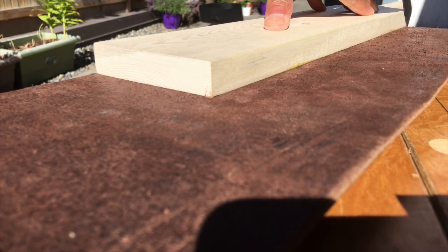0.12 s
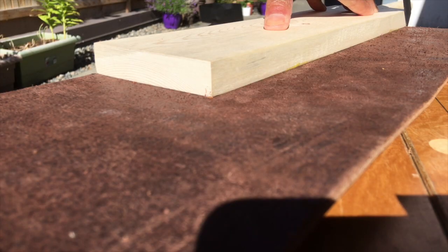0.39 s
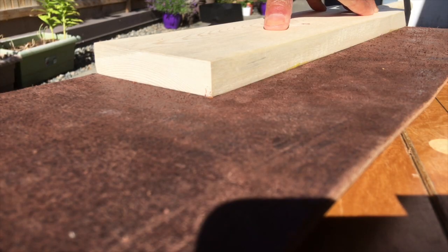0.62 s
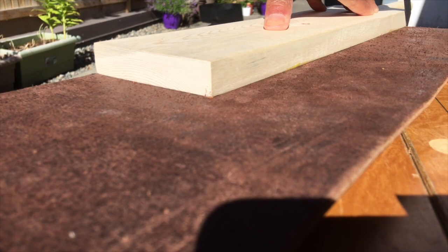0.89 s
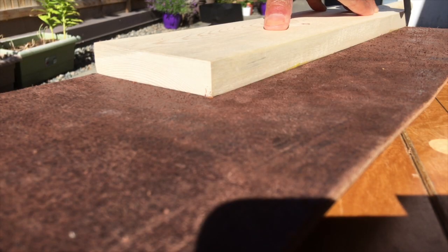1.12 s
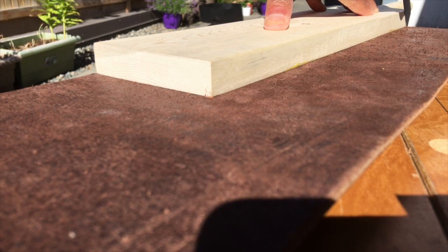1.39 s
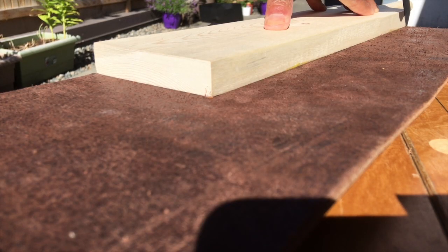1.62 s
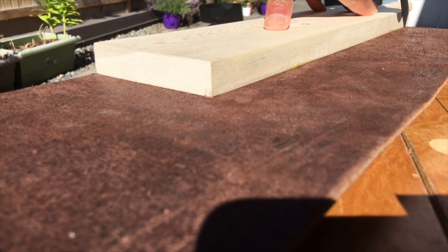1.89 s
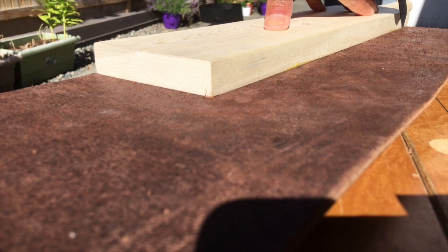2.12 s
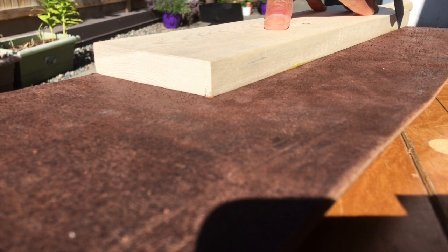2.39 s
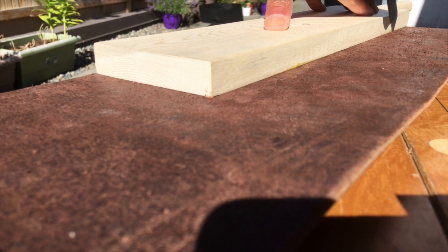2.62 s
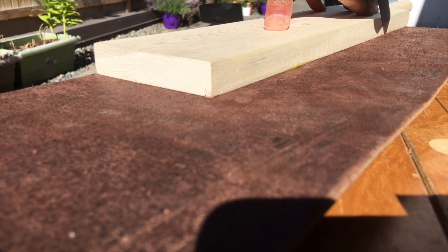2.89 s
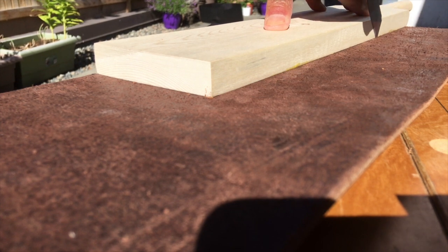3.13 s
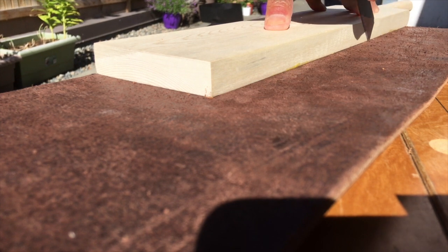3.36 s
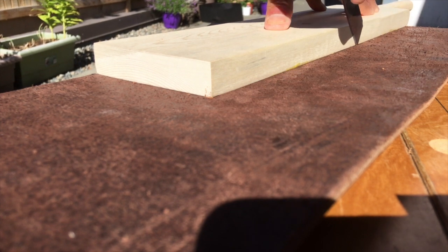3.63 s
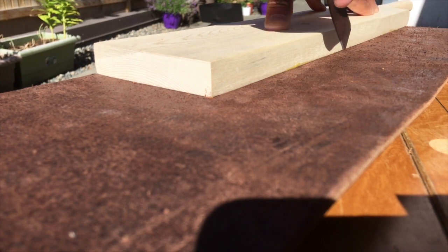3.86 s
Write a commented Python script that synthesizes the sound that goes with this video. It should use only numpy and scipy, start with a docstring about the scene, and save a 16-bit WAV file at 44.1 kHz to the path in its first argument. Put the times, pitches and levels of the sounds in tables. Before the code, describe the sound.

Blade scraping on wood: faint touches, a small tick and brief scratch, then a long, gritty, shifting rasp with one late knock, recorded close outdoors over soft traffic wash and a far engine's low throb.

```python
"""Heard first: a far engine that slows, revs once and slows again, over traffic wash, both outdoors.
Engine: cosines at orders of a gliding firing rate. Wash: coloured noise in drifting patches.
Faint brushes, then a steel blade lands with a tick on a softwood board, is drawn along its edge
toward the microphone, and knocks once. Brushes, ticks: shaped noise; knock: noise in board rings.
Stroke: dense grit-like slips drive rings of blade and board whose levels and pitches shift."""
import sys
import numpy as np
from scipy import signal
from scipy.fft import rfft, irfft
from scipy.io import wavfile
from scipy.ndimage import uniform_filter1d

SR = 44100
rng = np.random.default_rng(int(sys.argv[2]) if len(sys.argv) > 2 else 0)


def volts_from_db(level):
    """Convert decibel levels to linear amplitude ratios."""
    exponent = np.asarray(level, float) / 20
    return 10 ** exponent


def wav_out(sig):
    """Save sig, one row per channel (or a flat mono array), as 16-bit PCM at SR to the path in sys.argv[1]."""
    wavfile.write(sys.argv[1], SR, np.round(np.clip(np.atleast_2d(sig).T, -1, 1) * 32767).astype(np.int16))


N = 176400

# traffic spectrum, relative: f/Hz, density/dB per Hz
WASH_SPECTRUM = [(12, -36.5), (20, -16), (60, 3.5), (116, -1), (177, -8), (388, -23.5), (976, -22.5),
                 (1330, -24), (2750, -39), (3440, -41), (4940, -48.5), (12800, -59), (16000, -77.5)]
# traffic swell: t/s, level/dB over WASH_DB
WASH_SWELL = [(0, 2), (2.5, 2.5), (4, 0.5)]
WASH_DB, WASH_PATCH_DB = -57, 1

# engine firing rate: t/s, f/Hz
FIRING_RATE = [(0, 35.8), (.27, 34.4), (.44, 32.7), (.64, 31), (1, 27.7), (1.22, 26.8), (1.41, 29.5),
               (1.55, 31.5), (1.8, 30.1), (2.12, 28.1), (2.45, 26), (2.98, 22.3), (3.24, 21), (3.6, 19.8),
               (3.84, 19.3), (4, 18.6)]
# strong engine orders: t/s, rms level/dB of orders 2, 3, 4, 5
STRONG_ORDERS = [(0, -69, -48.5, -72, -67), (.27, -61, -54, -68, -59), (.45, -53, -52.5, -66, -56.5),
                 (.64, -56, -64.5, -56, -52), (.83, -57, -51.5, -55.5, -63), (1.05, -57, -70.5, -62, -54),
                 (1.26, -63.5, -67, -63, -58.5), (1.41, -49, -51, -47, -66), (1.65, -52, -50.5, -49, -55.5),
                 (1.9, -54.5, -44, -50.5, -54.5), (2.1, -62, -55, -54, -60), (2.4, -61, -54, -57, -54.5),
                 (2.69, -51.5, -55, -63, -46.5), (2.87, -62, -56, -50, -50.5),
                 (3.0, -59, -57, -48.5, -46.5), (3.24, -79, -76, -55, -57.5), (3.5, -63, -52, -46.5, -51),
                 (3.75, -60, -53.5, -45.5, -47.5), (4, -70, -65, -48, -52)]
# engine orders 7 and 9: t/s, rms level/dB of 7, of 9
UPPER_ORDERS = [(0, -76, -82), (.25, -66.5, -76), (.55, -76, -88), (.85, -69.5, -68), (1.1, -65.5, -60),
                (1.3, -60, -61), (1.5, -67, -76), (1.8, -59, -68), (2.15, -69, -62.5), (2.4, -77, -64),
                (3, -78, -72.5), (4, -90, -85)]
# other engine orders by frequency: f/Hz, level/dB
EXHAUST_SPECTRUM = [(15, -92.5), (40, -68.5), (130, -73.5), (170, -69.5), (200, -70.5), (245, -69.5),
                    (290, -73), (330, -76), (380, -81), (450, -89.5)]
# other engine orders over time: t/s, level/dB added to the spectrum
EXHAUST_LEVEL = [(0, -4), (.8, -3.5), (1.1, -5), (1.5, 4.5), (2.2, -2), (2.8, -2), (4, -6)]
THROB_DB, THROB_RAD, THROB_S = 2.5, 0.25, 0.07
WAVER_DB, WAVER_S = 4.5, 0.1
BLUR_RAD, BLUR_S = 0.08, 0.07

# light brushes of hand or blade: t/s, length/s, dull level/dB, thin bright level/dB
BRUSHES = [(.239, 0.0027, -91, -79), (0.715, 0.058, -82, -90), (0.968, 0.044, -89, -89),
           (1.553, 0.027, -78, -92), (1.617, 0.011, -78, -87), (1.639, 0.01, -76, -85),
           (1.606, 0.075, -73, -99)]
# dull brush spectrum, relative: f/Hz, density/dB per Hz
DULL_BRUSH_SPECTRUM = [(1180, -25), (2000, -2), (3430, -6), (5450, -22), (6190, -13), (13000, -45),
                       (15000, -34.5)]
# bright brush spectrum, relative: f/Hz, density/dB per Hz
BRIGHT_BRUSH_SPECTRUM = [(4000, -26), (6500, -3), (9500, 10), (14000, 6), (16000, -26)]
# blade lands: t/s, level/dB
LANDINGS = [(1.8412, -51), (2.156, -61)]
# landing tick spectrum, relative: f/Hz, density/dB per Hz
TICK_SPECTRUM = [(1500, -13), (2800, 12), (4200, -7), (6300, 3), (9000, -19), (15500, -2)]
# blade catches on the grain: t/s, level/dB
KNOCKS = [(3.64, -39)]
LANDING_T60_S, KNOCK_T60_S = 0.011, 0.023

# stroke: t/s, level/dB
STROKE_LEVEL = [(1.86, -80), (1.9, -60.5), (1.91, -67), (1.94, -52.5), (1.96, -60.5), (1.97, -54),
                (2.08, -65.5), (2.12, -64.5), (2.128, -91), (2.15, -86), (2.158, -69.5), (2.18, -68.5),
                (2.2, -64.5), (2.25, -58), (2.26, -61.5), (2.47, -58), (2.56, -61), (2.69, -53),
                (2.82, -58), (2.94, -54.5), (2.97, -54.5), (3.21, -52.5), (3.46, -52.5), (3.47, -50.5),
                (3.52, -53), (4.0, -52.5)]
# ring groups along the board: t/s, level/dB over the stroke of board, upper, treble, bright
GROUP_LEVEL = [(1.9, -38, -11, -24, -27), (2.1, -17, -10, -33, -28), (2.3, -22, -15, -9.5, -12.5),
               (2.55, -32, -24, -18.5, -24), (2.65, -19, -5.5, -16.5, -14), (3.0, -31, -15, -5, -10.5),
               (3.15, -12, -10.5, -11.5, -22), (3.3, -13.5, -25, -10.5, -12.5), (3.55, -16, -6, -8, -20),
               (3.7, -10, -13, -7, -6), (4, -7.5, -6.5, -14, -8)]
# board rings: f/Hz, width/Hz, level/dB within group
BOARD_RINGS = [(510, 45, 3.5), (800, 140, 10), (1297, 124, 18.5), (2200, 98, 19)]
# upper rings: f/Hz, width/Hz, level/dB within group
UPPER_RINGS = [(5830, 200, -5), (6400, 170, 3)]
# treble rings: f/Hz, width/Hz, level/dB within group
TREBLE_RINGS = [(7000, 746, 0.5), (9140, 170, -17), (8860, 900, -4.5), (9540, 1300, -2.5),
                (11700, 1900, -19.5)]
# bright rings: f/Hz, width/Hz, level/dB within group
BRIGHT_RINGS = [(11850, 540, 11), (12800, 350, 2.7)]
# top of the treble: f/Hz, width/Hz, level/dB within group
AIR_RING = [(15400, 6500, 0)]
# top of the treble: t/s, level/dB over the stroke
AIR_LEVEL = [(1.9, -18), (2.3, -21), (2.55, -19), (2.7, -21), (3.2, -20), (3.6, -29), (4, -8)]
# lowest board ring: f/Hz, width/Hz of each of two passes, level/dB within group
THRUM_RING = [(320.4, 53, 0)]
# unringing part, relative: f/Hz, density/dB per Hz
RASP_SPECTRUM = [(240, -63), (400, -31), (536, 0.5), (1090, -9.5), (2320, 0), (5690, -4.5), (7630, -16),
                 (11800, -22), (16000, -54)]
RASP_DB, THRUM_DB = -2, -14  # over the stroke
# rings that shift with the contact point, one track each: t/s, f/Hz, level/dB over the stroke
MOVING_RINGS = [
    [(1.9, 2400, -26), (2.25, 2350, -13), (2.6, 2360, -35), (2.95, 2410, -5), (3.3, 2510, -5.5),
     (3.6, 2280, -10), (4, 2270, -28)],
    [(1.9, 2790, -23), (2.25, 2680, -5), (2.5, 2760, -11.5), (2.7, 2680, -14.5), (3.0, 2620, 2),
     (3.3, 2710, -15), (3.5, 2770, -17), (3.8, 2760, -9), (4, 2680, -3.5)],
    [(1.9, 3160, -10), (2.5, 3176, -6.5), (2.8, 3170, -13), (3.0, 3120, -10), (3.08, 3300, -15),
     (3.09, 3580, -10), (3.14, 3280, -7), (3.185, 3470, -3.5), (3.2, 3320, -15), (3.6, 3320, -15),
     (4, 3370, -5)],
    [(1.9, 3500, -14), (2.25, 3480, -7), (2.4, 3760, -8), (2.7, 3880, -1), (2.85, 3980, -8),
     (3.05, 3820, -28), (3.3, 3780, -26), (4, 3830, -8.5)],
    [(1.9, 4230, -20), (2.55, 4150, -6), (2.72, 4370, -8), (2.85, 4430, -5), (3.1, 4500, -13),
     (3.125, 4460, -32), (3.19, 4500, -30), (3.21, 4500, -25), (3.4, 4720, -15), (3.66, 4260, -19),
     (3.76, 4140, -3.5), (4, 4210, -9)],
]
# the same rings: width/Hz of each of two passes
MOVING_WIDTHS = [380, 210, 240, 290, 400]
# dips where sound off the table cancels the direct: width/Hz, track of t/s, f/Hz, depth/0-1
TABLE_DIPS = [(356, [(1.9, 5730, 1), (2.3, 5760, 1), (2.45, 5300, 0.4), (2.8, 5140, 0.02), (3.0, 4940, 1),
              (3.1, 4730, 0.9), (3.125, 4400, 1), (3.185, 4200, 1), (3.2, 4220, 0), (3.4, 4050, 0.4),
              (3.6, 4730, 0), (3.78, 4800, 0.6), (4, 5100, 0.5)]), (304, [(1.9, 5030, 0.3),
              (2.3, 5250, 0.5), (2.4, 6000, 0.7), (2.5, 6560, 1), (3.05, 6150, 0.6), (3.2, 6100, 0.46),
              (3.65, 6450, 1), (3.75, 6400, 0.6), (4, 6860, 0.8)]), (710, [(1.9, 7800, 0.29),
              (2.15, 8300, 0.9), (2.5, 8900, 0.48), (2.9, 7740, 0.7), (3.3, 8100, 0.1), (3.7, 6900, 1),
              (4, 7800, 0)]), (202, [(1.9, 1180, 1), (2.6, 1220, 0.9), (3.05, 1230, 1), (3.5, 1130, 0.27),
              (4, 1050, 0.5)]), (300, [(2.95, 3800, 0.3), (3.05, 3950, 0.7), (3.11, 4000, .8),
              (3.12, 4000, 0.1)])]
# patches of colour that drift as the grain changes: f/Hz, rms depth/dB
GRAIN_PATCHES = [(300, 1.0), (6000, 1.0), (8000, 1.8), (16000, 1.8)]
# quick treble chatter, stronger early in the stroke: t/s, rms depth/dB
CHATTER_DEPTH = [(1.9, 2.5), (2.55, 2.5), (2.75, 1.2), (4, 1.0)]
CHATTER_S, CHATTER_HZ = 0.003, 3000
SLIPS_PER_S, SLIP_SPREAD_DB = 14000, -0.5
JUDDER_DB, JUDDER_S = 0.1, 0.014
WOBBLE_SHARE, WOBBLE_S = 0.007, 0.015

EDGE_HZ = 15780


def evened(x):
    """Scales to rms 1."""
    return x / np.sqrt(np.mean(x ** 2) + 1e-20)


def curve(rows, column=1):
    """One table column, interpolated at every sample."""
    rows = np.array(rows)
    return np.interp(np.arange(N) / SR, rows[:, 0], rows[:, column])


def colour(x, spectrum):
    """Filters by a spectrum table, linear in dB over log frequency; rms 1."""
    f_hz, db = np.transpose(spectrum)
    bin_hz = np.fft.rfftfreq(len(x), 1 / SR)
    gain = volts_from_db(np.interp(np.log(bin_hz + 1), np.log(f_hz + 1), db))
    return evened(irfft(rfft(x) * gain, len(x)))


def drift(window_s):
    """Slow random curve of rms 1: noise averaged twice."""
    size = max(int(window_s * SR), 2)
    return evened(uniform_filter1d(uniform_filter1d(rng.standard_normal(N), size), size))


def patchy(x, depth_db, bins, frames):
    """Random louder and softer patches over time and frequency."""
    z = signal.stft(x, nperseg=1024, noverlap=768)[2]
    patches = rng.standard_normal(z.shape)
    for _ in range(2):
        patches = uniform_filter1d(patches, bins, 0)
        patches = uniform_filter1d(patches, frames, 1)
    z = z * volts_from_db(depth_db * evened(patches))
    return signal.istft(z, nperseg=1024, noverlap=768)[1][:N]


def resonate(x, hz, width_hz):
    """Resonance of gain 1: shift to 0 Hz, one-pole low-pass, shift back; hz may be a curve."""
    turn = np.exp(2j * np.pi * np.cumsum(hz * np.ones(len(x))) / SR)
    r = np.exp(-np.pi * width_hz / SR)
    return 2 * (turn * signal.lfilter([1 - r], [1, -r], x / turn)).real


def rings(x, table):
    """Parallel resonances, summed to rms 1."""
    return evened(sum(volts_from_db(db) * resonate(x, hz, width_hz) for hz, width_hz, db in table))


def decays(hits, t60_s):
    """Sudden onsets that fall 60 dB in t60_s."""
    t = np.arange(N) / SR
    return sum((t >= s) * volts_from_db(db - 60 * np.maximum(t - s, 0) / t60_s) for s, db in hits)


def wash():
    """Distant traffic: coloured noise with drifting patches."""
    noise = colour(rng.standard_normal(N), WASH_SPECTRUM)
    noise = evened(patchy(noise, WASH_PATCH_DB, bins=8, frames=10))
    return volts_from_db(WASH_DB + curve(WASH_SWELL)) * noise


def engine():
    """Orders of the firing rate: 2-5 swell and slip singly, the rest share a phase blur."""
    firing_hz = curve(FIRING_RATE)
    phase = 2 * np.pi * np.cumsum(firing_hz) / SR
    blurred = phase + BLUR_RAD * drift(BLUR_S)
    out = np.zeros(N)
    for k in range(2, 6):
        level_db = curve(STRONG_ORDERS, column=k - 1) + THROB_DB * drift(THROB_S)
        slip = 2 * np.pi * rng.random() + THROB_RAD * drift(THROB_S)
        out += volts_from_db(level_db) * np.cos(k * phase + slip)
    for column, k in ((1, 7), (2, 9)):
        out += volts_from_db(curve(UPPER_ORDERS, column)) * np.cos(k * blurred)
    f_hz, db = np.transpose(EXHAUST_SPECTRUM)
    for k in [1, 6, 8, *range(10, 22)]:
        level_db = np.interp(k * firing_hz, f_hz, db) + curve(EXHAUST_LEVEL)
        level_db += WAVER_DB * drift(WAVER_S)
        out += volts_from_db(level_db) * np.cos(k * blurred + 2 * np.pi * rng.random())
    return np.sqrt(2) * out  # peak to rms levels


def brushes():
    """Light contact of hand or blade: short humps of dull and bright noise."""
    t = np.arange(N) / SR
    dull, bright = np.zeros(N), np.zeros(N)
    for s, length_s, dull_db, bright_db in BRUSHES:
        hump = np.sin(np.pi * np.clip((t - s) / length_s, 0, 1)) ** 0.5
        dull += volts_from_db(dull_db) * hump
        bright += volts_from_db(bright_db) * hump
    dull_noise = colour(rng.standard_normal(N), DULL_BRUSH_SPECTRUM)
    bright_noise = colour(rng.standard_normal(N), BRIGHT_BRUSH_SPECTRUM)
    return dull * dull_noise + bright * bright_noise


def landing():
    """Blade meets board: ticks of coloured noise with a fast decay."""
    return decays(LANDINGS, LANDING_T60_S) * colour(rng.standard_normal(N), TICK_SPECTRUM)


def knock():
    """Blade catches on the grain: decaying noise in the two highest board rings."""
    return decays(KNOCKS, KNOCK_T60_S) * rings(rng.standard_normal(N), BOARD_RINGS[2:])


def fixed_rings(slips):
    """Blade and board modes of fixed pitch, their levels changing along the edge."""
    out = volts_from_db(curve(AIR_LEVEL)) * rings(slips, AIR_RING)
    out += volts_from_db(THRUM_DB) * rings(rings(slips, THRUM_RING), THRUM_RING)
    groups = (BOARD_RINGS, UPPER_RINGS, TREBLE_RINGS, BRIGHT_RINGS)
    for column, table in enumerate(groups, start=1):
        out += volts_from_db(curve(GROUP_LEVEL, column)) * rings(slips, table)
    return out


def moving_rings(slips):
    """Rings that follow the contact point, wavering in pitch as the contact skips."""
    out = np.zeros(N)
    for width_hz, track in zip(MOVING_WIDTHS, MOVING_RINGS):
        hz = curve(track) * (1 + WOBBLE_SHARE * drift(WOBBLE_S))
        ring = resonate(resonate(slips, hz, width_hz), hz, width_hz)
        out += volts_from_db(curve(track, column=2)) * evened(ring)
    return out


def table_dips(x):
    """Cancellation by sound off the table: moving resonances subtracted in turn."""
    for width_hz, track in TABLE_DIPS:
        depth = np.clip(curve(track, column=2), 0, 1)
        x = x - depth * resonate(x, curve(track), width_hz)
    return x


def body(slips):
    """Blade and board: unringing rasp plus rings, dipped, in patches of drifting colour."""
    rasp = volts_from_db(RASP_DB) * colour(slips, RASP_SPECTRUM)
    out = table_dips(rasp + fixed_rings(slips) + moving_rings(slips))
    bin_hz = np.fft.rfftfreq(1024, 1 / SR)
    depth_db = np.interp(bin_hz, *np.transpose(GRAIN_PATCHES))
    return patchy(out, depth_db[:, None], bins=12, frames=10)


def scrape():
    """Dense slips of uneven size ring the body under a juddering stroke; the treble chatters."""
    happens = rng.random(N) < SLIPS_PER_S / SR
    size_db = SLIP_SPREAD_DB * np.minimum(rng.exponential(1, N), 4)
    sound = body(rng.standard_normal(N) * happens * volts_from_db(size_db))
    low_pass = signal.butter(2, CHATTER_HZ, fs=SR, output="sos")
    low = signal.sosfiltfilt(low_pass, sound)
    sound = low + (sound - low) * volts_from_db(curve(CHATTER_DEPTH) * drift(CHATTER_S))
    # 6.7 ms fade-in up to the first stroke point
    fade_in = np.clip((np.arange(N) / SR - STROKE_LEVEL[0][0]) / 0.0067 + 1, 0, 1)
    return fade_in * volts_from_db(curve(STROKE_LEVEL) + JUDDER_DB * drift(JUDDER_S)) * sound


def scene():
    """All sources at one microphone."""
    return (wash() + engine() + brushes() + landing() + knock() + scrape())[None]


def top_cut(x):
    """Nothing passes above 16.85 kHz."""
    return signal.sosfilt(signal.butter(12, 16850, fs=SR, output="sos"), x)


def record(dry):
    """Low-passes the mix at EDGE_HZ with a steep linear-phase filter."""
    taps = signal.firwin(1023, EDGE_HZ, window=("kaiser", 9), fs=SR)
    mix = signal.oaconvolve(dry, taps[None], "same")
    return top_cut(mix)


dry = scene()
out = record(dry)
wav_out(out)
```